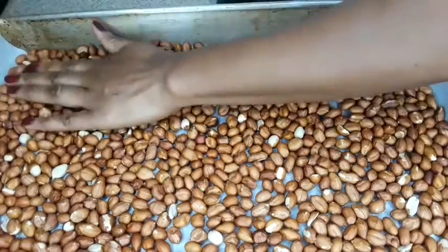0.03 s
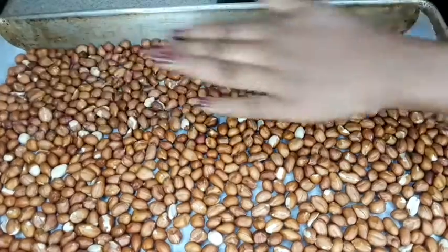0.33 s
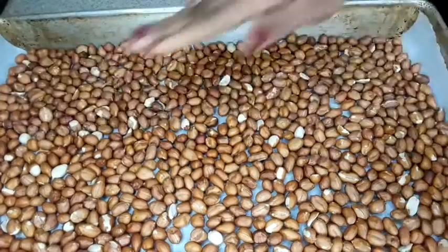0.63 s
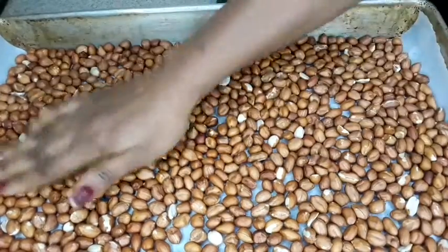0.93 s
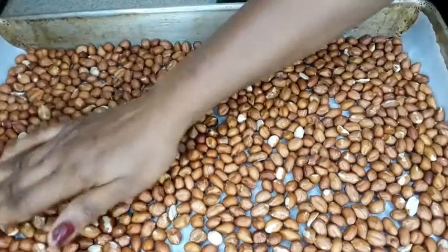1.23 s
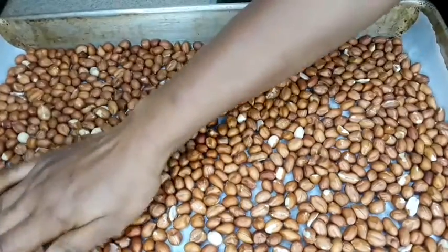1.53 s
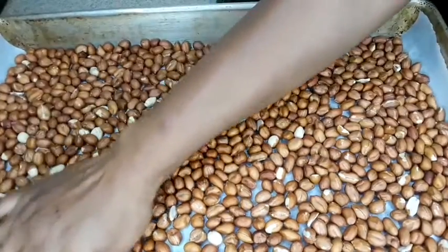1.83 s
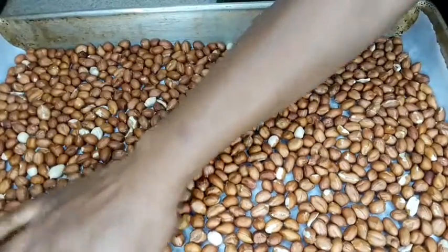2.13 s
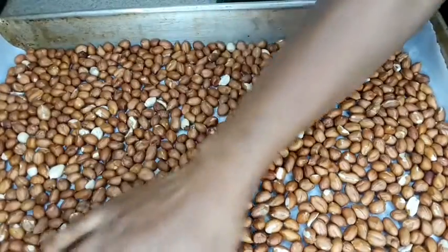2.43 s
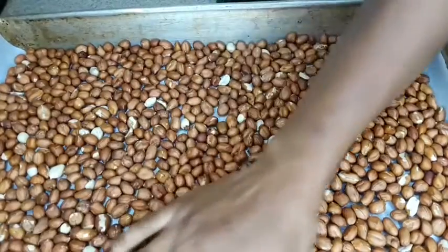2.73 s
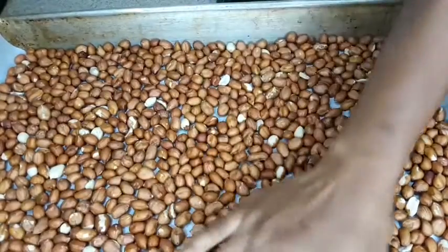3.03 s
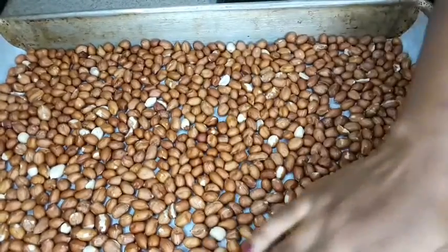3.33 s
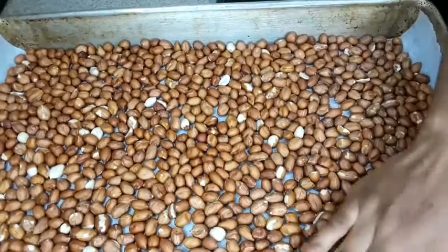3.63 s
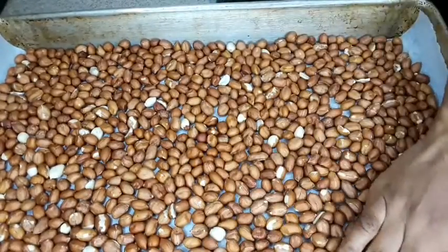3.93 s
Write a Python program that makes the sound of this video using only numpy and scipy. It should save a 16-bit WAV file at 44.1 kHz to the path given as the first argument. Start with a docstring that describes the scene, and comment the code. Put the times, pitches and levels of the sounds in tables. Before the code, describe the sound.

Peanuts clack and rattle on a metal baking tray under a patting hand, close by in a small kitchen. One pat comes at the start, then a pause. From 1 second, pats follow about three times a second, with soft thuds, papery rubbing and faint ticks of cracking skins. They weaken after 3.5 seconds, and the tray booms softly at about 3.8. An appliance hums quietly throughout.

```python
"""A short flurry of clacks, a soft thud and a papery hiss: a hand pats roasted peanuts flat on a metal
baking tray, close by in a small kitchen. Pat after pat drives the nuts against the damped metal, and
their dry skins rub and crack under the palm. An appliance hums throughout.
The tray flexes and booms once under the last push."""
import sys
import numpy as np
from scipy import signal
from scipy.fft import rfft, irfft, next_fast_len
from scipy.io import wavfile
from scipy.ndimage import map_coordinates

SR = 44100
rng = np.random.default_rng(int(sys.argv[2]) if len(sys.argv) > 2 else 0)


def unload_wav(signal):
    """Save mono or channel-first audio to the path in sys.argv[1] as 16-bit WAV at rate SR, clipped to [-1, 1]."""
    wavfile.write(
        sys.argv[1],
        SR,
        np.round(np.clip(np.atleast_2d(signal).T, -1, 1) * 32767).astype(np.int16),
    )


N = 176400  # 4 s


def amp(db):
    """Decibels to gain."""
    return 10 ** (np.asarray(db) / 20)


def unit_rms(x):
    """Scale to rms 1."""
    return x / np.sqrt(np.mean(x ** 2) + 1e-20)


def unit_peak(x):
    """Scale to peak 1."""
    return x / np.abs(x).max()


def curve(points, hz):
    """Interpolate (f/Hz, value) points over log frequency."""
    knots_hz, values = np.transpose(points)
    return np.interp(np.log(hz + 1), np.log(knots_hz + 1), values)


def fade(t, t60_s):
    """1 before t = 0, then 60 dB down per t60_s."""
    return 1000 ** (-np.maximum(t, 0) / t60_s)


def swell(at_s, rise_s, hold_s, fall_s):
    """Envelope reaching 1 at at_s; rise and fall times per 60 dB."""
    t = np.arange(N) / SR - at_s
    return fade(-t, rise_s) * fade(t - hold_s, fall_s)


def wobble(rate_hz):
    """Smooth random curve, rate_hz knots a second."""
    knots = rng.standard_normal(int(N * rate_hz / SR) + 4)
    return map_coordinates(knots, [np.arange(N) * rate_hz / SR])


def filtered(x, response):
    """Apply a complex frequency response."""
    size = 2 * next_fast_len(x.shape[-1])
    hz = np.fft.rfftfreq(size, 1 / SR)
    return irfft(rfft(x, size) * response(hz), size)[..., :x.shape[-1]]


def min_phase(db):
    """Minimum-phase response with these levels."""
    cepstrum = irfft(db * np.log(10) / 20)
    half = len(cepstrum) // 2
    cepstrum[1:half] *= 2
    cepstrum[half + 1:] = 0
    return np.exp(rfft(cepstrum))


def add(out, at_s, x):
    """Mix x into out at at_s."""
    start = max(round(at_s * SR), 0)
    out[:, start:start + x.shape[-1]] += x[..., :max(out.shape[-1] - start, 0)]


def delays_s(lead_ms):
    """Left and right delays for a given left lead."""
    return np.maximum([[-lead_ms], [lead_ms]], 0) / 1000


def tones(lines, drift_hz, waver_db):
    """Sum of slightly unsteady sines from (f/Hz, rms level/dB) rows."""
    out = np.zeros(N)
    for hz, db in lines:
        gain = np.sqrt(2) * amp(db + waver_db * wobble(12.02))
        phase = 2 * np.pi * np.cumsum(hz + drift_hz * wobble(10)) / SR
        out += gain * np.sin(phase)
    return out


def contact(lead_ms, t60_s, size, spread_ms=0.0823, width=0.632):
    """One nut chatters briefly; its place on the tray sets the left-right delay."""
    bursts = rng.standard_normal((3, size)) * fade(np.arange(size) / SR, t60_s)
    stereo = bursts[0] + width * bursts[1:]
    lag_s = delays_s(lead_ms + spread_ms * rng.standard_normal())
    return filtered(stereo, lambda f: np.exp(-2j * np.pi * f * lag_s))


def flurry(lead_ms, push, size, count=48, rate_hz=520, scatter_db=4):
    """A quick uneven run of contacts, scaled by the hand's push at each moment."""
    out = np.zeros((2, size))
    times_s = (np.arange(count) + rng.uniform(0, 1, count)) / rate_hz
    gains = amp(scatter_db * rng.standard_normal(count))
    for at_s, gain in zip(times_s, gains):
        add(out, at_s, push(at_s) * gain * contact(lead_ms, t60_s=0.01633, size=512))
    return out


# Nut contact spectrum: f/Hz, rel. level/dB
NUT_SPECTRUM = [(60, -26.5), (300, -20), (550, -20), (900, -5), (1500, 0), (2100, -3), (3000, -13.5),
                (4200, -20), (6000, -30.5), (8000, -30.5), (9500, -44), (16000, -41.5)]
# Loaded tray's modes: f/Hz, bandwidth/Hz, rel. level/dB
TRAY_MODES = [(774, 230, -7), (1012, 70, -10), (1272.7, 66.5, -6.5), (1411.6, 80, 0.5), (1490.7, 46, -3.5),
              (1682, 107.5, -2), (1873, 116, -6.5), (2012.7, 77, -6), (2170, 67, -3), (2403, 93, -0.5),
              (2592, 92, 2.5), (2846, 90, -0.5)]
def tray(x, tilt_db_per_oct, ring_db=-4, scatter_db=1, pivot_hz=1490.7):
    """Contacts, coloured by the nut, ring the damped metal; each spot favours other modes."""
    spot_db = scatter_db * rng.standard_normal(len(TRAY_MODES))

    def response(f):
        modes = sum(amp(db + offset_db) * 1j * f * width_hz / (hz * hz - f * f + 1j * f * width_hz)
                    for (hz, width_hz, db), offset_db in zip(TRAY_MODES, spot_db))
        metal_db = 20 * np.log10(.5 + amp(ring_db) * abs(modes))
        tilt_db = tilt_db_per_oct * np.log2(np.clip(f / pivot_hz, .5, 4))
        return min_phase(curve(NUT_SPECTRUM, f) + tilt_db + metal_db)
    return filtered(x, response)


# Palm thud spectrum: f/Hz, rel. level/dB
THUD_SPECTRUM = [(25, -20.5), (60, -9), (100, 1), (170, -7), (260, -12), (400, -7.5), (800, -18),
                 (2000, -59.5)]
def thud(hold_s, size, t60_s=0.176):
    """The palm lands on the tray: a dull burst of noise."""
    burst = rng.standard_normal(size) * fade(np.arange(size) / SR - hold_s, t60_s)
    return unit_rms(filtered(burst, lambda f: min_phase(curve(THUD_SPECTRUM, f))))


# Pats: t/s, length/s, rel. rattle level/dB, rel. thud level/dB, tilt/(dB/oct), left lead/ms, rise/s
PALM_PATS = [(0.0, 0.00582, -24, -42.5, -0.5, 0.3027, .008),
             (0.978, 0.00953, -22.5, -33, 1, 0.224, 0.001887),
             (0.988, 0.00946, -16.5, -34.5, 1.5, 0.301, 0.00536),
             (1.339, 0.01079, -24, -38.5, 0, 0.191, 0.00191),
             (1.634, 0.01215, -20, -42, 4, 0.126, 0.002837), (1.91, 0.0204, -22.5, -36, 1, 0.1244, 0.01856),
             (2.267, 0.017, -29.5, -44, -2, 0.289, 0.0388), (2.547, 0.0294, -28, -70, -1, 0.111, 0.03923),
             (2.578, 0.01996, -24.5, -38, -1.5, 0.149, .01),
             (2.874, 0.0553, -30.5, -50, -1.5, 0.0714, 0.02492),
             (3.174, 0.0251, -23, -44, 1.5, -0.0453, 0.02214),
             (3.518, 0.0377, -35.5, -42, -2.5, 0.0205, 0.01187),
             (3.789, 0.0189, -35, -39.5, -4.5, 0.0051, 0.0307)]
def pats(settle_t60_s=0.0331, thud_trim_db=-13, size=8192):
    """The palm drives a flurry of nuts against the tray and thuds on it."""
    out = np.zeros((2, N))
    for at_s, length_s, rattle_db, thud_db, tilt_db_per_oct, lead_ms, rise_s in PALM_PATS:
        early_s = min(at_s, rise_s / 2)
        push = lambda t: fade(early_s - t, rise_s) * fade(t - early_s - length_s, settle_t60_s)
        rattle = unit_rms(tray(flurry(lead_ms, push, size), tilt_db_per_oct))
        add(out, at_s - early_s, amp(rattle_db) * np.sqrt(length_s * SR / size) * rattle)
        add(out, at_s + length_s / 2, amp(thud_db + thud_trim_db) * thud(length_s / 2, size))
    return out


# Rubbed skin spectrum: f/Hz, rel. level/dB
HISS_SPECTRUM = [(300, -3), (1500, 11), (3000, 6.5), (5500, -0.5), (7600, -0.5), (9200, -7.5), (12000, -1),
                 (15000, -10), (16000, -21)]
# Palm slides: t/s, rise/s, hold/s, fall/s, level/dB
PALM_SLIDES = [(0.0, .02, 0.0095, 0.21, -43.5), (0.999, .02, 0.0098, 1.38, -59),
               (1.339, 0.0098, 0.0414, 0.27, -50), (1.637, .012, 0.088, 0.01, -45),
               (1.805, 0.059, 0.0102, 0.0962, -50.5), (1.91, 0.0123, 0.0867, 0.4772, -48),
               (2.237, 0.013, 0.0203, 1.04, -53), (2.544, 0.031, 0.026, 0.3974, -45),
               (2.884, 0.106, 0.0256, 0.1968, -45.5), (3.162, 0.0375, 0.0157, 0.17, -44.5),
               (3.515, .08, 0.071, 0.42, -55), (3.788, 0.179, .055, 0.1, -45.5), (3.897, .02, 0.1, 8, -54)]
def skin_hiss(grain_db=1.0, flutter_db=3.0):
    """Dry skins hiss in fine grains under the sliding palm."""
    pressure = sum(amp(db) * swell(*timing) for *timing, db in PALM_SLIDES)
    grains = rng.standard_normal((2, N)) * amp(grain_db * wobble(900) + flutter_db * wobble(60))
    return pressure * unit_rms(filtered(grains, lambda f: amp(curve(HISS_SPECTRUM, f))))


# Air rush spectrum: f/Hz, rel. level/dB
AIR_SPECTRUM = [(25, -42), (55, -9.5), (110, -2.5), (160, 3.5), (240, -6.5), (330, -4.5), (550, -9),
                (850, -7.5), (1100, -19), (1700, -28.5), (3000, -35), (7000, -38), (15000, -41.5)]
# Air rush stereo image: f/Hz, left-right correlation
AIR_CORRELATION = [(100, 0.76), (300, 0.93), (900, 0.132), (2500, 0.049), (10000, 0.045)]
# Mains and motor lines: f/Hz, rel. level/dB
HUM_LINES = [(119.8, -51), (239.6, -64.5), (360, -68), (898, -55.5)]
def appliance(air_db=-53):
    """Mains hum and motor whine over a low rush of air."""
    def mid_side_gains(f):
        angle = np.arccos(np.clip(curve(AIR_CORRELATION, f), -1, 1)) / 2
        return amp(curve(AIR_SPECTRUM, f)) * [np.cos(angle), np.sin(angle)]
    mid, side = filtered(rng.standard_normal((2, N)), mid_side_gains)
    air = unit_rms(np.array([mid + side, mid - side]))
    hum = tones(HUM_LINES, drift_hz=0.763, waver_db=0.26)
    return amp(air_db) * air + hum * amp([[.9], [-.9]])  # hum slightly left


# Single nut strikes: t/s, rel. level/dB, f/Hz, snap re ping/dB
NUT_STRIKES = [(.023, -29.5, 1566, -16), (0.0331, -18, 1072, 0), (0.0349, -12.5, 1940, -16),
               (0.0838, -20, 1500, -11), (.101, -31, 1543, -14.5), (.921, -31, 1001, 0),
               (0.9931, -11, 1745, -9.5), (1.344, -13, 1754, -5.5), (1.6293, -19, 1584, -5.5),
               (1.636, -16, 1652, 7), (1.911, -17.5, 1901, -0.5), (1.9279, -16, 1700, -3.5),
               (2.098, -36, 1469, -16), (2.2458, -23, 1463, 0.5), (2.2713, -18.5, 1685, 3),
               (2.551, -20, 1568, 0), (2.583, -15.5, 1485, -4.5), (2.5876, -21, 1579, -7.5),
               (2.5994, -19, 1171, -17), (2.711, -29, 1512, -8.5), (2.733, -32, 1700, -6),
               (2.8763, -13, 1671, -12), (2.9128, -10.5, 2255, 7), (3.043, -36.5, 1388, -14),
               (3.159, -21, 1490, -9), (3.163, -13, 1516, -3), (3.1731, -15.5, 1740, -7.5),
               (3.1876, -15, 1886, -9.5), (3.315, -27.5, 1600, 2), (3.532, -21, 1668, 0),
               (3.569, -34, 1510, -4), (3.640, -32, 1750, 0), (3.689, -32, 1600, 2),
               (3.7944, -22, 1710, 11)]
def clacks(trim_db=0.5, chatter_db=-17.5, ping_rise_s=0.00289, palm_damping=.35, size=4096):
    """Single nuts hit the metal by the hand: a hard snap, some chatter, a ping at the spot's pitch."""
    out = np.zeros((2, N))
    pat_times_s, *_, pat_leads_ms, _ = np.transpose(PALM_PATS)
    for at_s, db, hz, snap_db in NUT_STRIKES:
        lead_ms = np.interp(at_s, pat_times_s, pat_leads_ms)
        t = np.arange(size) / SR - delays_s(lead_ms)
        impulse = np.diff(1.0 * (t >= 0), prepend=0)
        chatter = amp(chatter_db) * contact(lead_ms, t60_s=0.0322, size=size)
        snap = tray(impulse + chatter, tilt_db_per_oct=1)
        ping_t60_s = .0065 * amp(-palm_damping * db)  # harder press, shorter ring
        ping = np.sin(2 * np.pi * hz * t) * fade(t, ping_t60_s) * (1 - fade(t, ping_rise_s))
        clack = unit_peak(ping) + amp(snap_db) * unit_peak(snap)
        add(out, at_s, amp(db + trim_db) * unit_peak(clack))
    return out


# Cracking skin spectrum: f/Hz, rel. level/dB
CRACK_SPECTRUM = [(500, -29), (2500, -3), (5500, 4), (9000, -3.5), (14000, -7.5), (16000, -11.5)]
# Skin cracks: t/s, rel. level/dB
SKIN_CRACKS = [(1.215, -47.5), (1.639, -31.5), (1.684, -27.5), (1.701, -36), (1.714, -34.5), (1.809, -45),
               (1.912, -34.5), (1.926, -38.5), (2.913, -40), (3.904, -46)]
def skin_cracks(trim_db=-14.5, t60_s=0.0156, size=1024):
    """Now and then a dry skin cracks with a bright tick."""
    out = np.zeros((2, N))
    for at_s, db in SKIN_CRACKS:
        burst = rng.standard_normal((2, size)) * fade(np.arange(size) / SR, t60_s)
        tick = filtered(burst, lambda f: min_phase(curve(CRACK_SPECTRUM, f)))
        add(out, at_s, amp(db + trim_db) * unit_rms(tick))
    return out


# Flexing tray's tones: f/Hz, level/dB
FLEX_TONES = [(146, -42), (224, -53)]
def tray_boom():
    """The tray flexes and judders under the last push."""
    envelope = swell(at_s=3.842, rise_s=0.076, hold_s=0.0334, fall_s=0.146)
    return envelope * tones(FLEX_TONES, drift_hz=3.556, waver_db=-4)


# Room decay: f/Hz, T60/s
ROOM_DECAY = [(200, 0.56), (1000, 0.582), (2200, 0.5155), (5000, 0.548), (12000, 0.356)]
def kitchen(x, tail_db=-11, walls_db=-11, walls_t60_s=0.059, predelay_s=.004, size=22050):
    """Near walls and the room's tail answer, a little differently as the hand moves on."""
    out = np.zeros((2, N))
    hop = size // 2
    for start in range(0, N, hop):
        hz, frames_s, spectra = signal.stft(rng.standard_normal((2, size)), SR, nperseg=256)
        decay = fade(frames_s, curve(ROOM_DECAY, hz)[:, None])
        tail = signal.istft(spectra * decay, SR, nperseg=256)[1][:, :size]
        walls = rng.standard_normal((2, size)) * fade(np.arange(size) / SR, walls_t60_s)
        response = (amp(tail_db) * unit_rms(tail) + amp(walls_db) * unit_rms(walls)) / np.sqrt(size)
        reverb = signal.fftconvolve(x[:, start:start + hop], response, axes=1)
        add(out, start / SR + predelay_s, reverb)
    return out


def scene():
    """Hand, nuts and tray in the humming kitchen."""
    near = pats() + clacks() + skin_hiss() + skin_cracks() + tray_boom()
    return near + kitchen(near) + appliance()


def record(dry):
    """Brick-wall low-pass."""
    return filtered(dry, lambda hz: hz < 15850)


dry = scene()
out = record(dry)
unload_wav(out)
```